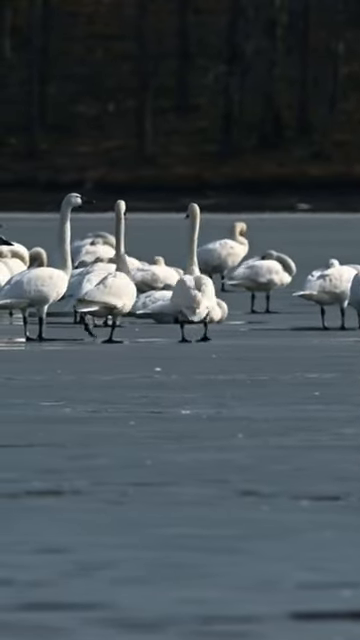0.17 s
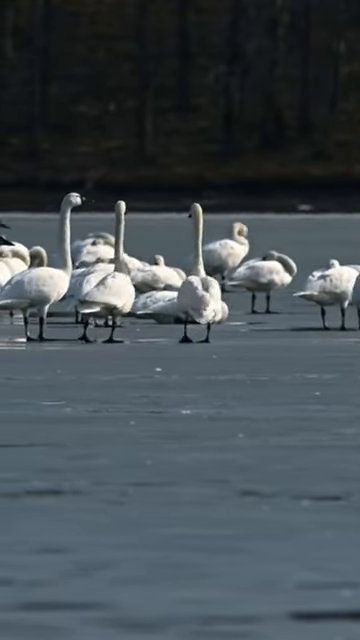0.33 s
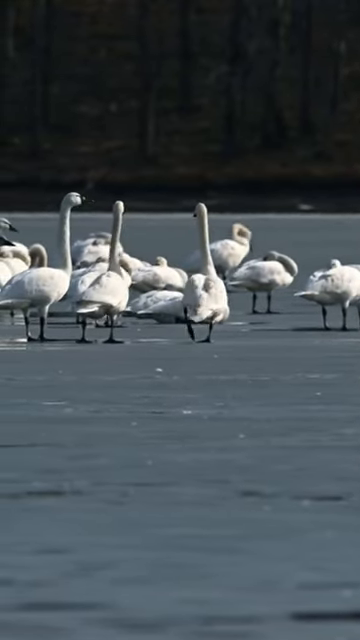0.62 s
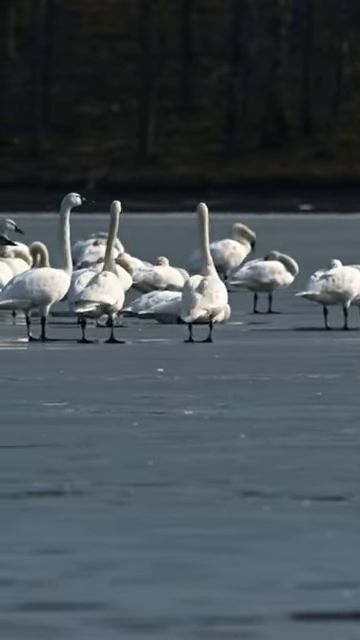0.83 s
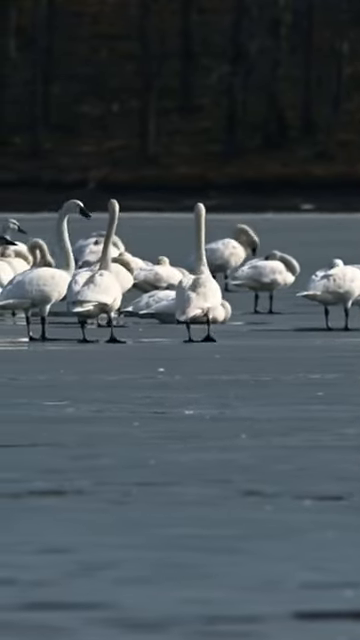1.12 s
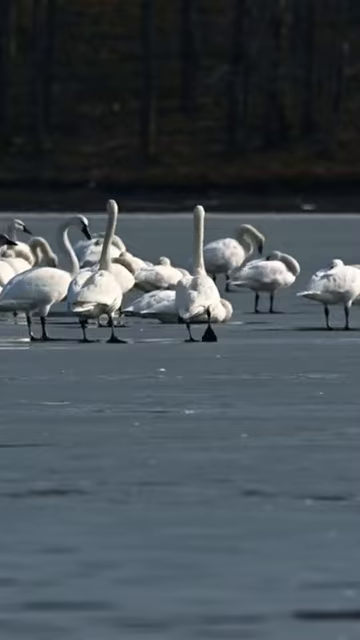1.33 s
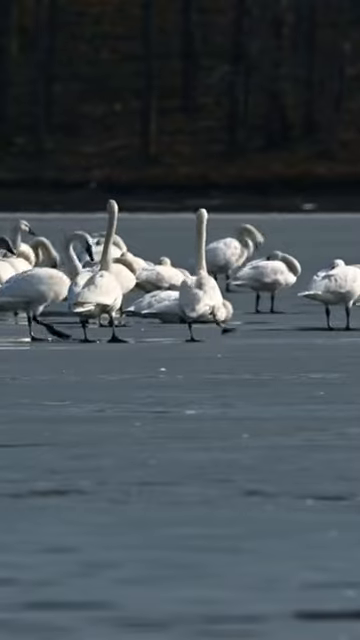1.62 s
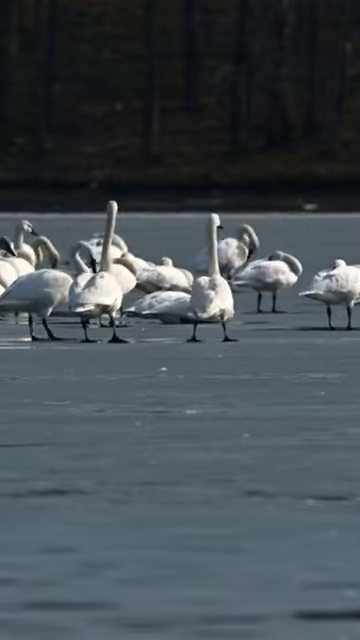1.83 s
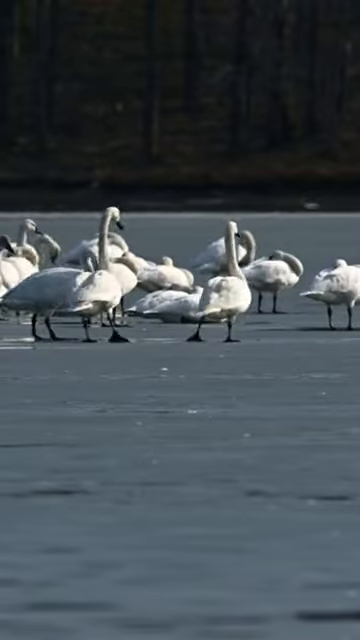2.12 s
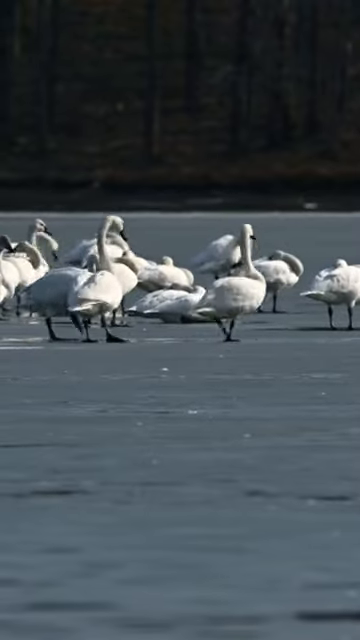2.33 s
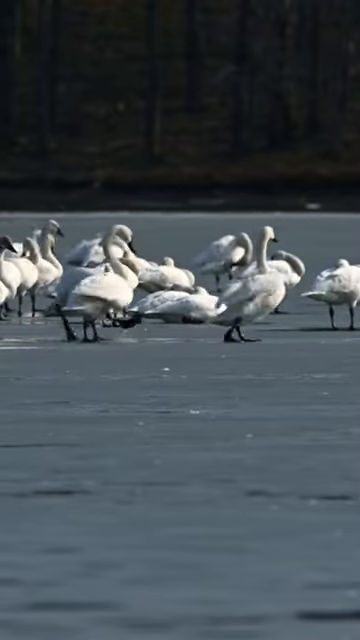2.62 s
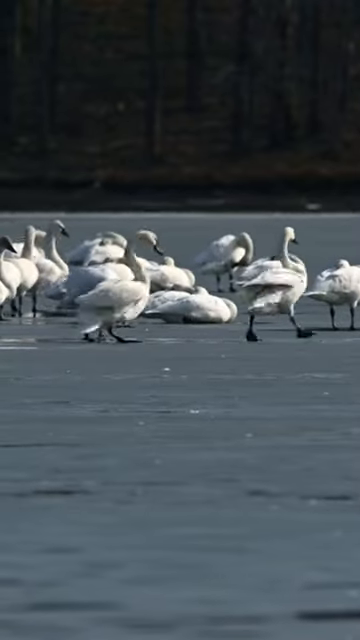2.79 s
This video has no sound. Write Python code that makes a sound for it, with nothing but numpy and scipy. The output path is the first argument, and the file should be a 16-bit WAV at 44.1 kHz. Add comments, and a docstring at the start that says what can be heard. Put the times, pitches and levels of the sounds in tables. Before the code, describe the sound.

Distant swan calls, soft low hoots then short arched honks, over rumbling wind and faint hiss.

```python
"""Wind rumbles unevenly and rushes in the trees over the faint hiss of the microphone.
Far across a frozen lake swans give a few low hoots and a grunt, amid short scuffs on the ice;
fainter notes come from birds farther off, then short honks that rise and fall in pitch.
Calls are harmonics of a gliding pitch, wind, scuffs and hiss are coloured noise,
and the wooded shore gives a weak echo."""
import sys
import numpy as np
from scipy import signal
from scipy.fft import rfft, irfft, next_fast_len
from scipy.io import wavfile
from scipy.ndimage import map_coordinates

SR = 44100
rng = np.random.default_rng(int(sys.argv[2]) if len(sys.argv) > 2 else 0)


def wav_record(signal):
    """Record a signal, one row per channel, as 16-bit PCM in the file named by sys.argv[1]."""
    frames = np.transpose(np.atleast_2d(signal))
    bounded = np.clip(frames, -1, 1)
    # unit amplitude maps onto the largest positive 16-bit level
    quanta = np.round(bounded * 32767).astype(np.int16)
    wavfile.write(sys.argv[1], SR, quanta)


N = 130536  # samples, just under 3 s


def amp(db):
    """Decibels to gain."""
    return 10 ** (np.asarray(db) / 20)


def unit(x):
    """Scale to rms 1."""
    return x / np.sqrt(np.mean(x ** 2) + 1e-20)


def curve(rows):
    """Join (t/s, value) points by straight lines, one value per sample."""
    return np.interp(np.arange(N) / SR, *np.transpose(rows))


def wobble(rate):
    """A smooth random curve, rate knots a second."""
    knots = rng.standard_normal(int(N * rate / SR) + 4)
    return map_coordinates(knots, [np.arange(N) * rate / SR])


def filtered(x, response):
    """Multiply the spectrum of x by a response of frequency."""
    size = next_fast_len(N + 8192)
    hz = np.fft.rfftfreq(size, 1 / SR)
    return irfft(rfft(x, size) * response(hz), size)[:N]


def noise(spectrum):
    """Noise of rms 1 coloured by (f/Hz, dB) points, joined along log frequency."""
    f, db = np.transpose(spectrum)

    def colour(hz):
        return amp(np.interp(np.log(hz + 1), np.log(f + 1), db))

    return unit(filtered(rng.standard_normal(N), colour))


def since(start):
    """Seconds since start, per sample."""
    return np.arange(N) / SR - start


def gate(t, length, attack, release):
    """Smooth attack, hold, release; all in seconds."""
    opening = np.sin(np.pi / 2 * np.clip(t / attack, 0, 1))
    closing = np.sin(np.pi / 2 * np.clip((length - t) / release, 0, 1))
    return opening * closing


def voice(hz, harmonics_db, jitter):
    """Harmonics of a slightly unsteady pitch, the fundamental first."""
    phase = 2 * np.pi * np.cumsum(hz * (1 + jitter * wobble(200))) / SR
    return np.sqrt(2) * sum(amp(db) * np.sin(k * phase) for k, db in enumerate(harmonics_db, 1))


def microphone_hiss():
    """Nearly flat noise of the microphone, its level faintly wavering."""
    # colour of the hiss: f/Hz, relative level/dB
    hiss_colour = [(300, 7), (1200, -1.5), (2000, 1.5), (3000, -1), (4200, 0.5), (8000, -0.5), (15500, -.5)]
    hiss_db, waver_db = -52.5, 0.35
    return amp(hiss_db + waver_db * wobble(14)) * noise(hiss_colour)


def wind():
    """Low rumble, a rush in the trees and a rustle that shares the level of the rush."""
    # colour of the rumble: f/Hz, relative level/dB per Hz
    rumble_colour = [(12, -44), (20, -22), (35, -5), (60, -1), (97, 1), (130, -2.5), (180, -3.5),
                     (240, -10.5), (304, -17.5), (400, -24.5), (520, -55), (880, -110)]
    # strength of the rumble: t/s, level/dB
    rumble_level = [(0.0, -22.5), (0.03, -17), (0.06, -21), (1.27, -25), (1.32, -21.5), (1.41, -28),
                    (1.47, -20.5), (1.66, -25), (2.38, -24.5), (2.41, -27.5), (2.47, -23), (2.65, -24.5),
                    (2.94, -22), (2.96, -21)]
    # colour of the rush in the trees: f/Hz, relative level/dB per Hz
    rush_colour = [(150, -21), (300, 4), (400, 2.5), (560, 0.5), (720, -4.5), (880, -6), (1020, -16.5),
                   (1200, -33), (1600, -65), (3000, -86)]
    # strength of the rush before its waver: t/s, level/dB
    rush_level = [(0, -39), (.2, -42), (.85, -40), (1.1, -42), (1.7, -42.5), (2.4, -41), (2.96, -44.5)]
    # colour of the rustle: f/Hz, relative level/dB per Hz
    rustle_colour = [(1200, -45), (2200, -11.5), (3000, 1), (3600, -3.5), (4500, -23), (8000, -33)]
    rustle_db = -24  # relative to the rush
    waver_db = 0.98

    rumble = amp(curve(rumble_level)) * noise(rumble_colour)
    trees = noise(rush_colour) + amp(rustle_db) * noise(rustle_colour)
    return rumble + amp(curve(rush_level) + waver_db * wobble(9)) * trees


def hoots():
    """Nearly pure low notes that settle downward; the rough ones sound like grunts."""
    # soft hoots: t/s, length/s, first f/Hz, f/Hz it settles toward, level/dB, roughness [0-1]
    hoot_calls = [(.290, 0.073, 592, 554, -31.5, 0.07), (.384, .058, 554, 546, -34.5, 0.12),
                  (.582, 0.069, 556, 532, -35, 0.03), (.912, 0.043, 540, 466, -29.5, 0.23),
                  (.228, 0.048, 520, 450, -39.5, .3)]
    # strength of each harmonic, the fundamental first: level/dB
    hoot_harmonics = [0, -38, -41, -48, -37, -48]
    attack_s, release_s = 0.027, 0.029
    settle = 2.6  # time constants of the glide in one hoot

    out = np.zeros(N)
    for start, length, first_hz, last_hz, db, rough in hoot_calls:
        t = since(start)
        glide = np.exp(-settle * np.clip(t / length, 0, 1))
        hz = last_hz + (first_hz - last_hz) * glide
        tone = voice(hz, hoot_harmonics, 0.059 * rough)
        tone = tone * (1 + rough * wobble(250))  # roughness of loudness
        out += amp(db) * gate(t, length, attack_s, release_s) * tone
    return out


def scuffs():
    """Short scuffs on the ice: a brief scrape over a dull thud, dying away together."""
    # scuffs: t/s, treble level/dB and thud level/dB (both before a 6 dB lift), time to fall 60 dB [s]
    ice_scuffs = [(.305, -54.5, -47, 0.055), (0.373, -52.5, -50, .07), (.862, -62, -41, 0.033),
                  (.91, -52, -32.5, 0.063)]
    # colour of the scrape: f/Hz, relative level/dB
    scrape_colour = [(1000, -26), (1800, -2), (2900, 4), (4200, -5.5), (7000, -3), (12000, -32)]
    # colour of the thud: f/Hz, relative level/dB
    thud_colour = [(250, -49), (500, -10), (650, 19), (850, -19), (1200, -18), (3000, -74)]
    rise_s = 0.003

    scrape, thud = noise(scrape_colour), noise(thud_colour)
    out = np.zeros(N)
    for start, scrape_db, thud_db, t60 in ice_scuffs:
        t = np.maximum(since(start), 0)
        envelope = (1 - np.exp(-t / rise_s)) * amp(6 - 60 * t / t60)
        out += envelope * (amp(scrape_db) * scrape + amp(thud_db) * thud)
    return out


def far_notes():
    """Faint held notes from the back of the flock, each a single unsteady sine."""
    # notes of birds farther off: t/s, length/s, f/Hz, level/dB
    held_notes = [(0.679, 0.078, 866, -52), (0.743, 0.063, 872, -45.5), (0.836, 0.096, 866, -50),
                  (0.932, 0.069, 860, -49.5), (1.97, 0.056, 940, -52.5)]
    edge_s, jitter = 0.025, 0.006  # jitter as a share of the pitch
    out = np.zeros(N)
    for start, length, hz, db in held_notes:
        out += gate(since(start), length, edge_s, edge_s) * voice(hz, [db], jitter)
    return out


def honks():
    """Pitch and brightness climb with effort to a crest and fall; harmonics slide through a fixed throat."""
    # arched honks: t/s, length/s, top f/Hz, crest [share of length], level/dB before the throat,
    # voice [0 thin, 1 full, 2 muffled], pitch roughness [share of pitch]
    honk_calls = [(1.371, .107, 768, 0.43, -53, 0, .005), (1.886, 0.099, 766, 0.394, -52, 0, .005),
                  (2.657, .096, 750, 0.424, -48.8, 0, 0.0076), (2.270, .172, 846, .53, -51.5, 1, .007),
                  (1.300, .115, 824, .46, -62.5, 2, .028), (2.902, 0.0495, 730, 0.476, -56, 1, .04)]
    # the throat of each voice: f/Hz, gain/dB
    throat_shapes = [
        [(600, -9), (780, -7.5), (1150, -8), (1350, -2.5), (1550, -2.5), (1900, -14), (2200, -16), (3000, -20),
         (4200, -32)],
        [(620, 3), (720, 8.5), (790, 6), (850, 0.5), (1300, -22), (1680, -13), (2200, -12), (2520, -0.5),
         (2850, -2), (3200, -0.5), (3400, -2.5), (3900, -14), (4400, -24)],
        [(700, 0), (1600, -13), (2450, -1), (3100, -17), (4200, -25)],
    ]
    # roundness of the pitch arch for each voice [exponent]
    arch_powers = [1.81, 1.4, 1.83]
    attack_s, release_s = 0.022, 0.023
    rise_share, fall_share = 0.235, 0.225  # how far below its top the pitch starts and ends
    open_db = 15.5  # the upper harmonics are this much weaker at the ends of a honk
    darken_db = 8.5  # over a honk the fundamental gains this and the upper harmonics lose it

    out = np.zeros(N)
    for start, length, top_hz, crest, db, kind, rough in honk_calls:
        t = since(start)
        u = np.clip(t / length, 0, 1) - crest  # negative before the crest
        distance = np.abs(u / np.where(u < 0, crest, 1 - crest))
        slack = distance ** arch_powers[round(kind)]  # 0 at the crest, 1 at the ends
        hz = top_hz * (1 - slack * np.where(u < 0, rise_share, fall_share))
        throat = np.transpose(throat_shapes[round(kind)])
        harmonics_db = [np.interp(k * hz, *throat) for k in range(1, 6)]
        harmonics_db[0] = harmonics_db[0] + darken_db * u
        for i in range(2, 5):  # third harmonic and up
            harmonics_db[i] = harmonics_db[i] - (open_db * slack + darken_db * u)
        level = amp(db + 1.6 * wobble(70))
        out += level * gate(t, length, attack_s, release_s) * voice(hz, harmonics_db, rough)
    return out


def shore(x):
    """A diffuse echo from the wooded shore: decaying noise after a short delay."""
    t60_s, delay_s = 1, 0.036
    t = np.arange(SR) / SR
    tail = rng.standard_normal(SR) * amp(-60 * t / t60_s) * (t > delay_s)
    return signal.fftconvolve(x, tail / np.linalg.norm(tail))[:N]


def scene():
    """The wind, and the flock and scuffs with their echo."""
    echo_db = -13.5
    flock = hoots() + scuffs() + far_notes() + honks()
    return (wind() + flock + amp(echo_db) * shore(flock))[None]


def record(dry):
    """The microphone adds its hiss and keeps nothing above its band limit."""
    top_hz = 15700
    return filtered(dry[0] + microphone_hiss(), lambda hz: hz < top_hz)[None]


dry = scene()
out = record(dry)
wav_record(out)
```